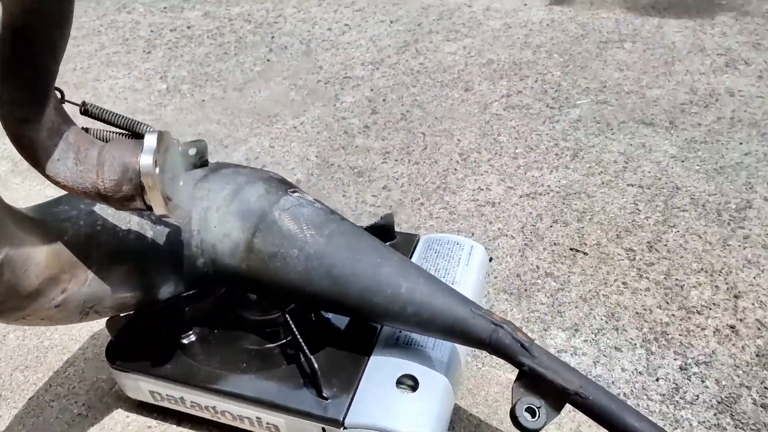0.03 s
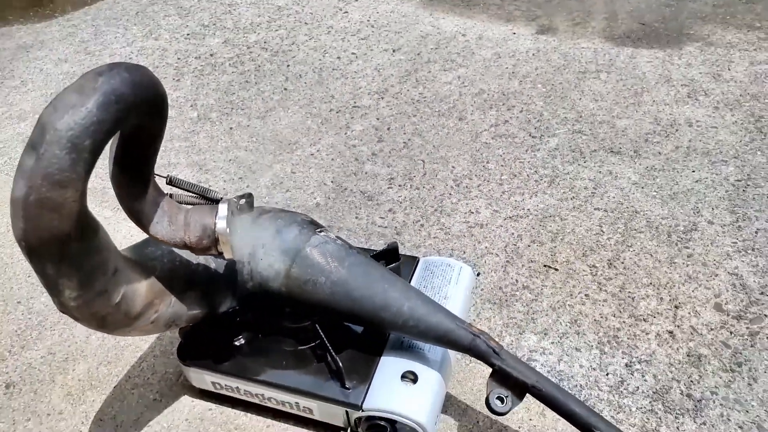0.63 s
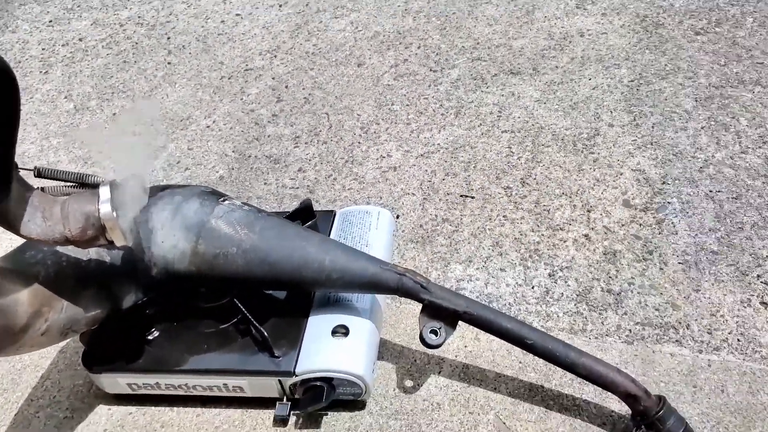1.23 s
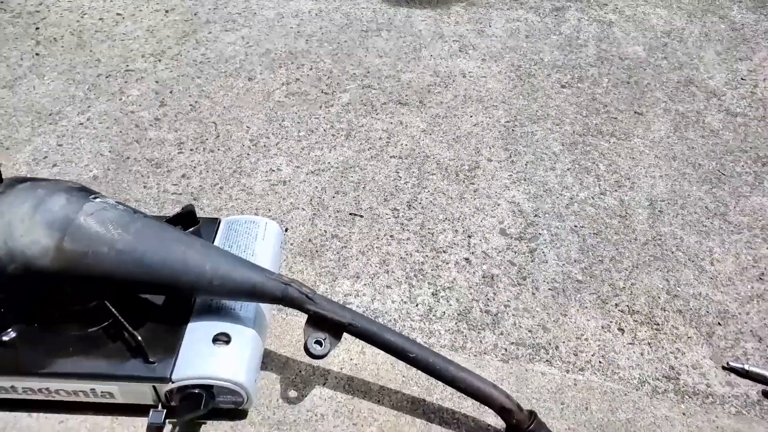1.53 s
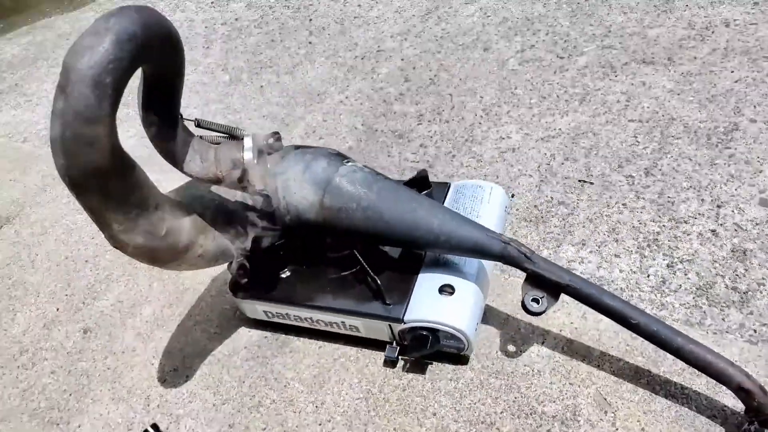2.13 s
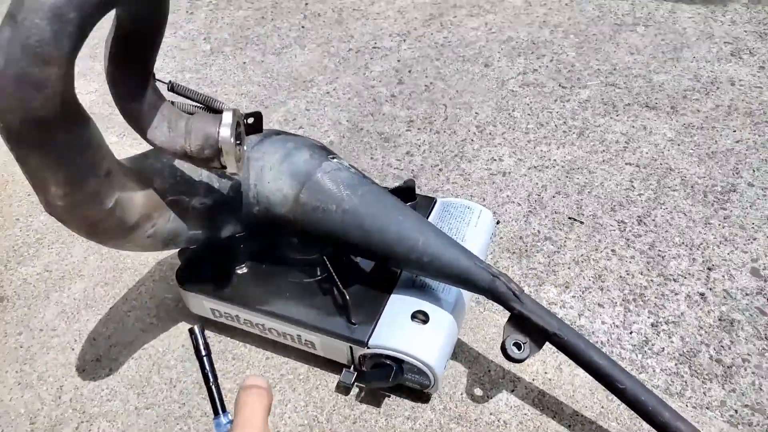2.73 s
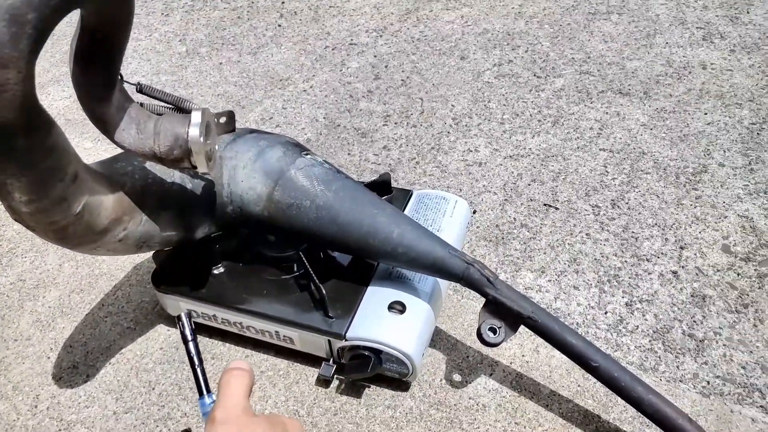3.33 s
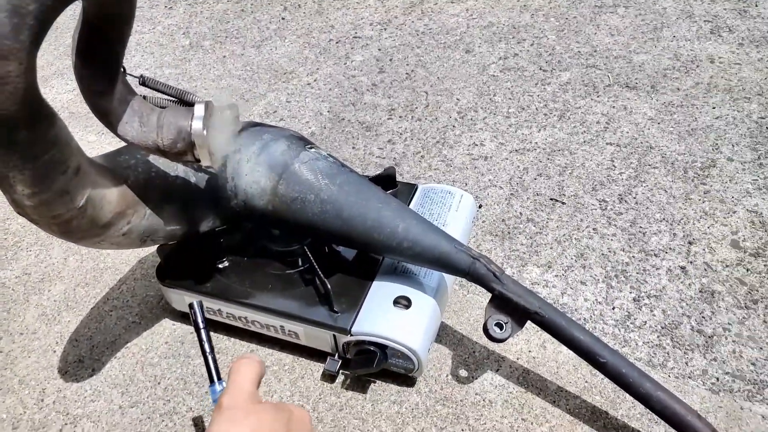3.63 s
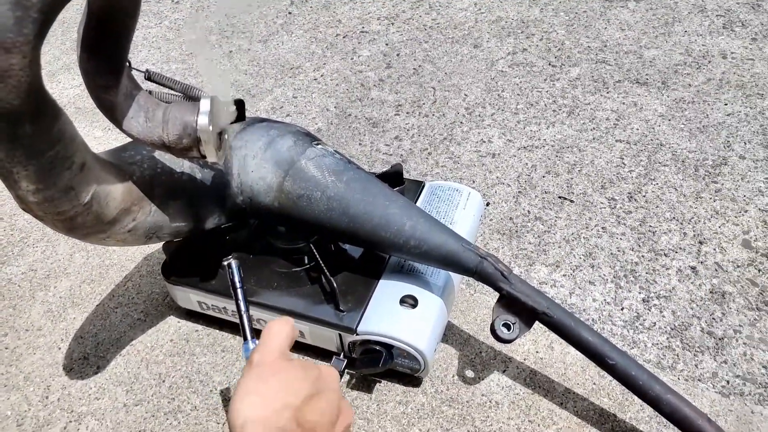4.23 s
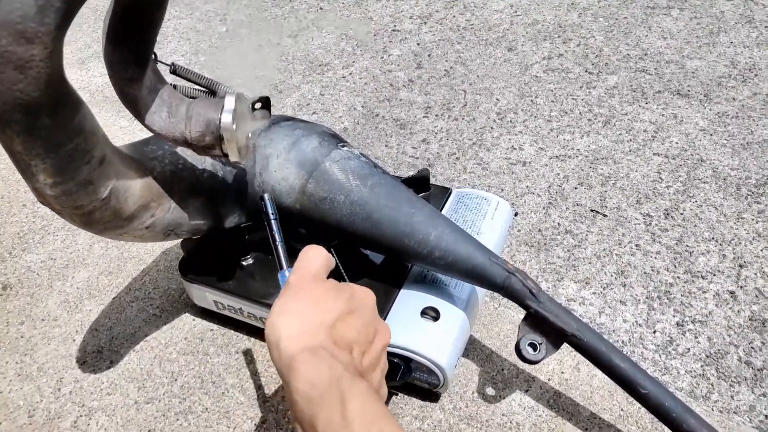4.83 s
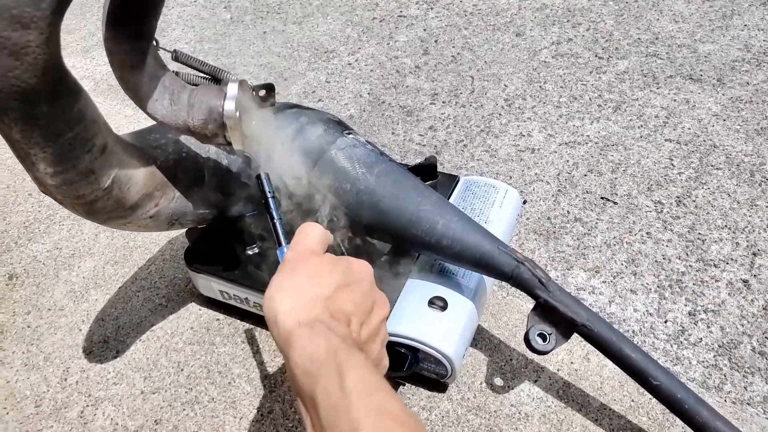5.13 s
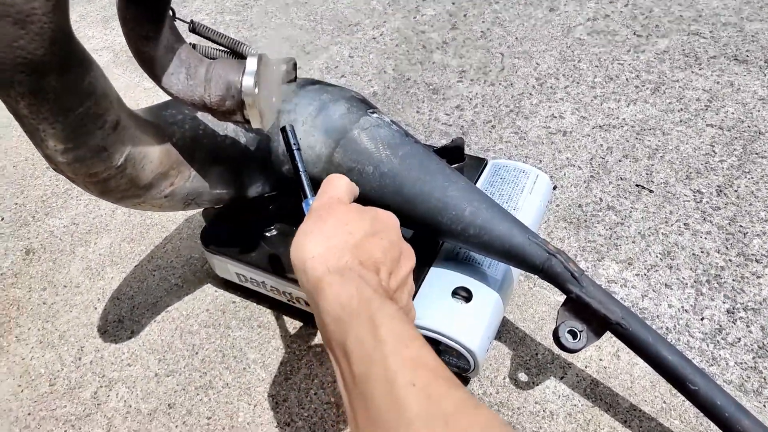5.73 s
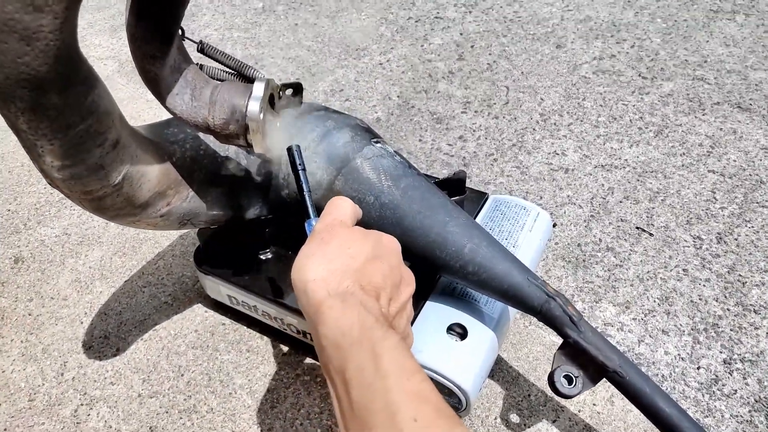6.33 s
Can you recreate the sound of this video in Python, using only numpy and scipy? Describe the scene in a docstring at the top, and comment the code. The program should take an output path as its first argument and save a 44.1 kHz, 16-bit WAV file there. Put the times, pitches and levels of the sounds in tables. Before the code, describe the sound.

Faint gas hiss and a gritty step, then one sharp lighter click and a steady rushing flame, with wind bumping the microphone.

```python
"""A camping gas stove hisses faintly under a steel exhaust pipe, outdoors on concrete, close to a stereo
microphone. Clothes rustle, a breeze buffets the two ports and a thin whistle wavers on the right.
Someone steps back, a sole rolling and cracking grit, fetches a long lighter and reaches in, which turns
the hiss pipe-like. Gas leaks from the lighter's tip, the igniter's spring hammer snaps and echoes round
the yard, and a flame hisses on steadily beside the pipe."""
import sys
import numpy as np
from scipy import signal
from scipy.fft import rfft, irfft, next_fast_len
from scipy.io import wavfile
from scipy.ndimage import map_coordinates

SR = 44100
rng = np.random.default_rng(int(sys.argv[2]) if len(sys.argv) > 2 else 0)


def log_audio(samples):
    """Write samples as a 16-bit WAV file to the path given in sys.argv[1]."""
    # one column per channel
    frames = np.atleast_2d(samples).T
    # limit to full scale, then quantise
    limited = np.clip(frames, -1, 1)
    pcm = np.round(limited * 32767).astype(np.int16)
    wavfile.write(sys.argv[1], SR, pcm)


N = 281799
TIME = np.arange(N) / SR
HZ = np.maximum(np.arange(N // 2 + 1) * SR / N, 1)

# The stove's faint jet. Each row: time in seconds, level in dB.
STOVE_LEVEL = [(0, -60.5), (1.25, -60.5), (2.7, -63), (3.25, -63), (4.0, -60.5), (4.4, -60.5),
               (4.85, -65.5), (6.39, -70)]
# A thin wavering whistle near 8.3 kHz. Each row: time in seconds, level in dB, centre in Hz.
WHISTLE_PATH = [(0, -62.5, 8500), (.35, -63, 8260), (.55, -73, 8600), (.65, -78, 8410), (.87, -62, 8300),
                (0.969, -87, 8540), (1.201, -64, 8300), (2.198, -64.5, 8250), (2.36, -72.5, 7960),
                (2.95, -61, 8370), (3.119, -72, 8420), (3.37, -59, 8390), (3.6, -71.5, 8240),
                (4.051, -62, 8300), (4.13, -74, 8270), (4.269, -58, 8340), (4.44, -74.5, 8460),
                (4.529, -61, 8270), (4.62, -89, 8220), (4.87, -63, 8200), (5.4, -63, 8500),
                (6.39, -90, 8500)]
# Body movements, each with a low rustle. Each row: start and length in seconds, level in dB.
BODY_MOVES = [(0.308, 0.77, -65), (1.36, 0.84, -67.5), (2.419, 0.17, -61.5), (2.849, 0.31, -60),
              (3.715, 0.21, -56.5), (3.3, 0.23, -54), (4.728, 0.18, -50.5), (5.073, 1.7, -57)]
# Clothes swishing, and chafing in a narrow band.
# Each row: middle and half length in seconds, level in dB, tilt in dB per octave.
CLOTH_SWISHES = [(0.35, 0.11, -51, -1), (0.67, 0.09, -51.5, 3.5), (1.043, 0.042, -57, 16),
                 (1.33, 0.017, -52, 10.5), (2.2, 0.051, -52.5, 1.5), (2.524, 0.14, -63, -2.5),
                 (2.88, 0.095, -62, 7), (3.92, 0.094, -60, 12), (4.39, 0.032, -62, 1)]
CLOTH_CHAFES = [(0.387, 0.04, -58.5, 3.5), (0.476, 0.078, -59.5, -4), (3.018, 0.02, -56.5, 8),
                (3.077, 0.062, -65.5, 0), (4.711, 0.029, -58, -0.5), (6.321, 0.042, -49, -4.5)]
# Soft thuds of feet, hands and the igniter's snap. Each row: time in seconds, level in dB.
SOFT_THUDS = [(1.364, -45.5), (1.563, -28.5), (1.923, -55), (2.013, -42.5), (2.042, -45), (4.727, -43.5),
              (5.101, -51.5)]
# Gusts on the microphone. Each row: start and length in seconds, left and right level in dB.
MIC_GUSTS = [(0.333, 0.77, -54, -62), (0.5, 0.53, -47, -55), (2.696, 0.16, -78, -49),
             (4.162, 0.4, -44, -70), (4.27, 0.13, -35.5, -60), (5.248, 0.28, -40, -75),
             (5.574, 0.46, -40, -40.5), (6.16, 0.3, -43, -48.5)]
# Eddies slapping the ports. Each row: time in seconds, peak in dB, centre in Hz, left minus right in dB.
MIC_EDDIES = [(.537, -44, 87.4, 28), (.593, -33.5, 106, 26), (.654, -32.5, 127, 22), (.742, -35, 92, -11),
              (.78, -39, 117.7, -11), (.873, -29, 121, 26), (2.728, -38.5, 115, -23),
              (2.824, -43, 118.3, -22), (4.211, -27.5, 115, 35), (4.3, -11, 247, 39), (4.307, -21, 111, 33),
              (4.332, -16, 170, 33), (4.338, -30, 119, 28), (4.373, -14.5, 128, 29),
              (4.401, -28.5, 113, 27), (5.264, -34, 94, 27), (5.306, -27, 118, 32), (5.335, -26, 114, 25),
              (5.379, -29, 109, 29), (5.424, -23.5, 152, 34), (5.454, -26, 108, 30),
              (5.514, -18.5, 137, 39), (5.593, -23, 130, 26), (5.622, -13.5, 97, 28),
              (5.64, -37, 131.3, -17), (5.72, -31, 105, -16), (5.764, -20, 116, -20),
              (5.889, -27.5, 114, -10), (5.988, -26.5, 106, -11), (6.297, -21.5, 115, 20),
              (6.311, -11, 97, 28), (6.365, -25.5, 124, -14)]
# Small sharp clicks: grit cracking underfoot, then ticks of handling the lighter.
# Each row: time in seconds, level in dB, tilt in dB per octave.
SHARP_CLICKS = [(1.084, -47.5, -1), (1.4167, -12, 3.5), (1.441, -20, -3.5), (1.467, -23.5, -1),
                (1.533, -36, 3), (1.542, -23, -3.5), (1.5832, -18.5, 3.5), (1.605, -22, 2), (1.714, -28, 5),
                (1.788, -37, 4), (1.794, -27, 0), (1.804, -23, 1), (1.837, -28, 9), (1.921, -17, 0.5),
                (1.931, -17, -8), (1.935, -28.5, -2), (1.9402, -9, 6), (1.943, -17, 8), (1.9496, -9, 4),
                (1.959, -19, -1), (1.9743, -11, 13), (1.978, -5.5, 6.5), (1.991, -26, 3), (2.065, -32, 2),
                (2.51, -45, -8), (4.73, -36.5, -5.5), (4.811, -31, -10), (4.846, -39.5, 1)]
# Strokes of a sole over the concrete.
# Each row: start and end in seconds, level in dB, first and last tilt in dB per octave.
SOLE_STROKES = [(1.344, 1.394, -55, -1, 0), (1.411, 1.441, -31.5, 1, 0.5), (1.534, 1.554, -34.5, 3, -0.5),
                (1.58, 1.922, -44, 7, 2), (1.917, 1.96, -28.5, -1, 8), (1.9755, 1.978, -18.5, 5.5, 5.5),
                (1.984, 1.986, -32, 4.5, 4)]
# The foot ends its step further to the right. Each row: time in seconds, left and right gain in dB.
FOOT_POSITION = [(1.4, 0, -1), (1.85, 1.5, 0.5), (1.95, -1, -1)]
# Soft low puffs and bumps. Each row: start and length in seconds, level in dB.
PUFFS_AND_BUMPS = [(3.375, 0.021, -47.5), (4.73, 0.011, -42.5)]

# The tone of each source. Each row: frequency in Hz, relative spectral level in dB.
JET_TONE = [(25, 31), (100, 21.5), (500, 6.5), (1400, -0.5), (2800, 0.5), (4300, 0), (6000, 0.5),
            (7600, 6.5), (9000, 4), (11000, -0.5), (13000, -3), (15500, 0)]
RUSTLE_TONE = [(25, 3), (90, 5), (200, 8), (350, 1), (650, -15.5), (950, -15), (1500, -25.5), (4000, -37),
               (12000, -66)]
SWISH_TONE = [(200, -19), (1300, -18), (2600, -15), (3900, -0.5), (5200, 2), (8000, 9), (11000, 6),
              (15000, -1.5)]
CHAFE_TONE = [(500, -20.5), (2300, -9), (3050, -3.5), (3400, -3), (3950, 4.5), (4400, -2), (5200, -19),
              (8000, -14), (15000, -47)]
THUD_TONE = [(30, -23), (100, -3.5), (200, -9), (370, 2.5), (520, -0.5), (700, -8), (1500, -20),
             (2500, -18), (8000, -99)]
WIND_TONE = [(20, -26), (45, -2.5), (75, 2), (115, 2.5), (170, -8.5), (260, -17), (450, -30.5), (1000, -44),
             (4000, -100)]
SOLE_TONE = [(20, -92), (100, -57), (240, -8), (400, -0.5), (560, -6), (850, -2), (1500, 3), (2400, 2.5),
             (4000, 0.5), (5500, -2), (8000, 4), (11000, -4.5), (13000, -9.5), (15500, -11)]   # shared by the sharp clicks
PUFF_BUMP_TONE = [(60, -14), (150, 5.5), (260, 9.5), (420, -2.5), (620, -10), (900, -16), (1500, -19),
                  (2300, -42), (6000, -64)]
GAP_TONE = [(300, -2), (1050, -9), (1650, 3.5), (2400, -12), (4000, -6.5), (6000, -1.5), (8000, -0.5),
            (10300, -11), (15000, -25)]   # the stove heard through the gap between hand and pipe
GAS_TONE = [(300, -40), (1400, -17), (4000, -29), (6000, -5), (8300, -1), (10000, 4), (11200, 8),
            (13000, -3), (15000, -13)]
FLAME_TONE = [(80, 7), (450, 3.5), (800, 6.5), (1600, 4), (2400, -3.5), (4000, -1.5), (5700, 3.5),
              (7200, 2), (8300, -1), (9600, -9.5), (11000, -2.5), (12600, -2), (15300, -2.5)]
IGNITER_TONE = [(100, -3), (500, -19.5), (1100, -9.5), (1700, -6.5), (2700, -1), (3700, -10), (4800, -8.5),
                (7000, 0), (8300, -1.5), (9400, 1), (11000, -4), (13000, -3), (15500, -5.5)]
YARD_TONE = [(200, -6), (1500, -12.5), (2600, 5.5), (3600, -2), (4800, 10), (6000, 4.5), (8300, 9.5),
             (11000, 6), (13000, 4), (15500, 8.5)]   # the snap coming back off ground and walls

# Resonances and cancellations. Each row: centre and width in Hz, gain in dB.
HISS_RESONANCES = [(874, 87, 9), (1820, 200, 3), (2670, 166, 9), (3460, 180, 3), (4220, 94, -8),
                   (5020, 130, 9), (5100, 80, -2), (5800, 350, -1.5), (7340, 85, 10.5), (7550, 89, 6.5),
                   (8150, 70, -8)]   # steady and narrow, they make the faint hiss sound hollow
HAND_GAP_BANDS = [(2600, 140, 11), (2760, 77, -5), (2930, 80, 12.5), (3240, 140, -19), (3730, 100, 13.5),
                  (4450, 200, -19), (4830, 110, 5), (5170, 220, -30), (6150, 100, -9)]
GAS_GAP_NOTCHES = [(4450, 200, -26), (5120, 130, -28), (6200, 110, -10), (9600, 180, -9)]   # the unlit gas reflecting in that gap
FLAME_COMB_LEFT = [(1230, 270, -14), (1650, 120, -27), (2060, 43, -8), (2450, 68, 2), (2900, 83, 3),
                   (3340, 135, -22), (3835, 126, -16), (4360, 160, -17), (5100, 220, -25), (6200, 300, -22),
                   (6900, 110, -20), (7940, 83, 1), (8350, 170, 9), (9100, 150, 4), (9400, 100, 0),
                   (11750, 400, -8)]   # reflections off pipe and stove, at each port
FLAME_COMB_RIGHT = [(1193, 97, -38), (2090, 29, -16), (2800, 110, -30), (3210, 124, -37), (3610, 100, -39),
                    (4540, 154, -25), (5030, 99, -28), (5330, 75, -16), (6320, 170, -8), (9100, 200, 2),
                    (9500, 200, -15), (10900, 490, -26)]
BARREL_RING = [(1550, 250, 2), (2160, 260, -14.5), (2780, 330, 0), (3360, 130, -6), (4850, 120, 8.5),
               (5540, 200, -5), (7040, 1300, 8.5), (8200, 260, 2.5), (8220, 120, 8), (10650, 610, 7)]   # the igniter and its barrel

# Response of the two microphone ports. Each row: frequency in Hz, gain in dB.
MIC_LEFT = [(500, -4), (1500, -3.5), (4000, -3), (6000, -6), (7800, -9.5), (8450, -10.5), (9300, -1),
            (10900, 8.5), (13000, 2.5), (15500, -3.5)]
MIC_RIGHT = [(500, -4.5), (1500, 0), (4000, 5), (6000, 1.5), (7800, 3.5), (8300, 6.5), (8800, 4.5),
             (9600, -7), (10200, -8.5), (11500, -7), (13000, -9), (15500, -2.5)]

STRIKE_S = 5.1038   # the igniter strikes and the flame takes over from the unlit gas


def from_db(db):
    """Decibels to gain."""
    return 10 ** (np.asarray(db) / 20)


def gains(rows):
    """Each dB column of a curve as a gain at every sample."""
    s, *columns = np.transpose(rows)
    return [from_db(np.interp(TIME, s, c)) for c in columns]


def response(points, tilt_db=0, at=HZ):
    """Gain at every frequency, tilted by so many dB an octave."""
    hz, db = np.transpose(points)
    return from_db(np.interp(np.log(at), np.log(hz), db) + tilt_db * np.log2(at / 1000))


def ripple(bands):
    """Gain at every frequency from a few bell-shaped peaks and dips."""
    level = np.zeros(len(HZ))
    for hz, width, db in bands:
        near = slice(*np.searchsorted(HZ, [hz - 3 * width, hz + 3 * width]))
        level[near] += db * np.exp(-((HZ[near] - hz) / width) ** 2)
    return from_db(level)


def colour(x, gain):
    """Give white sound a spectrum and keep its power."""
    return irfft(rfft(x) * gain / np.sqrt(np.mean(gain ** 2)), N)


def stereo_noise(alike, lag_ms=0):
    """White noise at two ports; the shared part reaches the left one lag_ms later."""
    shared = rng.standard_normal(N)
    direct = np.array([np.roll(shared, round(lag_ms * SR / 1000)), shared])
    return np.sqrt(alike) * direct + np.sqrt(1 - alike) * rng.standard_normal((2, N))


def flutter(per_s, depth_db):
    """A gain that wanders at random."""
    knots = rng.standard_normal(8192)
    return from_db(depth_db * np.interp(TIME * per_s, np.arange(len(knots)), knots))


def shimmer(x, per_s, depth_db, width_hz):
    """The colour shifts: each band at each port wanders in level by itself."""
    hz, s, spectra = signal.stft(x, SR, nperseg=512)
    grid = np.meshgrid(hz / width_hz, s * per_s, indexing="ij")
    knots = rng.standard_normal((2, 128, 128))
    patches = np.array([map_coordinates(port, grid, order=1, mode="mirror") for port in knots])
    return signal.istft(spectra * from_db(depth_db * patches), SR)[1][:, :N]


def swell(s, half, db):
    """A bell-shaped rise and fall."""
    return from_db(db) * np.exp(-.5 * np.minimum(((TIME - s) / half) ** 2, 100))


def burst(s, length, db, attack_s, release_s):
    """A level held from s on, with an exponential rise before and fall after."""
    near = slice(*np.searchsorted(TIME, [s - 10 * attack_s, s + length + 10 * release_s]))
    before = np.maximum(s - TIME[near], 0)
    after = np.maximum(TIME[near] - s - length, 0)
    out = np.zeros(N)
    out[near] = from_db(db) * np.exp(-before / attack_s - after / release_s)
    return out


def together(envelopes):
    """Envelopes adding in power."""
    return np.sqrt(sum(e ** 2 for e in envelopes))


def scatter(x, db, reach_ms, count=14):
    """Weak reflections off nearby things, different at each port."""
    lags = (rng.uniform(.05, 1, (2, count)) * reach_ms * SR / 1000).astype(int)
    signs = rng.choice([-1, 1], (2, count))
    echoes = [sum(sign * np.roll(port, lag) for lag, sign in zip(port_lags, port_signs))
              for port, port_lags, port_signs in zip(x, lags, signs)]
    return x + from_db(db) * np.array(echoes) / np.sqrt(count)


def rub(texture, strokes, spectrum):
    """Strokes of one texture, each with its own envelope and brightness."""
    out = np.zeros((2, N))
    for envelope, tilt_db in strokes:
        near = np.flatnonzero(envelope > 1e-3 * envelope.max())
        size = next_fast_len(len(near) + 1024)
        hz = np.maximum(np.arange(size // 2 + 1) * SR / size, 1)
        gain = response(spectrum, tilt_db, hz)
        part = rfft(texture[:, near] * envelope[near], size) * gain / np.sqrt(np.mean(gain ** 2))
        out[:, near] += irfft(part, size)[:, :len(near)]
    return out


def stove(left_hollowness=0.99):
    """The gas jet under the pipe: a faint hiss that sounds hollow at the microphone."""
    resonances = ripple(HISS_RESONANCES) ** np.array([[left_hollowness], [1]])
    hiss = colour(stereo_noise(alike=0.17), response(JET_TONE) * resonances)
    hiss = scatter(hiss, db=-1.5, reach_ms=8)
    return shimmer(hiss, per_s=6, depth_db=5.5, width_hz=200) * gains(STOVE_LEVEL)[0]


def whistle(width_hz=85):
    """A thin wavering whistle near 8.3 kHz, mostly at the right port."""
    s, db, hz = np.transpose(WHISTLE_PATH)
    unsteady = colour(rng.standard_normal((2, N)), 1 / (1 + (HZ / width_hz) ** 2))
    phase = 2 * np.pi * np.cumsum(np.interp(TIME, s, hz)) / SR
    level = from_db(np.interp(TIME, s, db)) * flutter(per_s=25, depth_db=4.0)
    tone = unsteady[0] * np.cos(phase) + unsteady[1] * np.sin(phase)
    return level * tone * from_db([[-2], [0]])


def body(still_db=-75.5, drag_db=-55, attack_s=0.094, release_s=0.1):
    """Close by: a low rustle, a dragged foot's rumble and thuds of feet, hands and the igniter's snap."""
    knocks = [burst(s, 0.00045, db, attack_s=0.0018, release_s=0.0099) for s, db in SOFT_THUDS]
    start, end, *_ = max(SOLE_STROKES, key=lambda row: row[1] - row[0])   # the longest is the drag
    drag = burst(start, end - start, drag_db, attack_s, release_s)
    thuds = colour(stereo_noise(alike=0.95), response(THUD_TONE)) * together(knocks + [drag])
    moves = [burst(*move, attack_s, release_s) for move in BODY_MOVES]
    moving = together(moves + [from_db(still_db)])
    rustle = colour(stereo_noise(alike=0.92), response(RUSTLE_TONE, tilt_db=-0.5))
    return thuds + rustle * moving * flutter(per_s=16, depth_db=2.86)


def clothes():
    """Cloth rubs close to the microphone, in bright swishes and narrow-band chafes."""
    swishes = [(swell(s, half, db), tilt_db) for s, half, db, tilt_db in CLOTH_SWISHES]
    chafes = [(swell(s, half, db), tilt_db) for s, half, db, tilt_db in CLOTH_CHAFES]
    swishing = rub(stereo_noise(alike=0.091), swishes, SWISH_TONE)
    return swishing + rub(stereo_noise(alike=0.099), chafes, CHAFE_TONE)


def wind(wake_db=-9.5, wake_s=0.0096, sharp_db=-16):
    """Each port has its own turbulence; an eddy is a pressure lump between two dips, or for every other eddy a
    dip between two lumps, wrapped in churn."""
    left = together(burst(s, length, db, attack_s=.02, release_s=.035) for s, length, db, _ in MIC_GUSTS)
    right = together(burst(s, length, db, attack_s=.02, release_s=.035) for s, length, _, db in MIC_GUSTS)
    churn = colour(rng.standard_normal((2, N)), response(WIND_TONE))
    air = churn * [left, right] * flutter(per_s=52, depth_db=4.5)
    for k, (s, db, hz, pan_db) in enumerate(MIC_EDDIES):
        near = np.abs(TIME - s) < .06
        age = TIME[near] - s
        roundness = 2 + max(sharp_db - db, 0)   # weaker eddies are rounder
        spread = (np.pi * hz * age) ** 2 / roundness
        polarity = (-1) ** (k + 1)
        lump = polarity * (1 - (2 * roundness + 1) * spread) / (1 + spread) ** (roundness + 2)
        wake = churn[:, near] * from_db(wake_db) * np.exp(-np.abs(age) / wake_s)
        port_db = db + np.minimum([[pan_db], [-pan_db]], 0)
        air[:, near] += from_db(port_db) * (lump + wake)
    return air


def scuffs(attack_s=0.0071, release_s=0.025, tail_db=-8, tail_s=0.054):
    """Envelopes and tilts of a sole rolling from heel to toe; the yard answers with a short tail."""
    strokes, tails = [], []
    for s, end, db, heel_tilt_db, toe_tilt_db in SOLE_STROKES:
        length = end - s
        push = burst(s, length, db, min(attack_s, length), min(release_s, length))
        rolled = np.clip((TIME - s) / length, 0, 1)
        strokes += [(push * (1 - rolled), heel_tilt_db), (push * rolled, toe_tilt_db)]
        built_up = np.sqrt(1 - np.exp(-2 * length / tail_s))
        tails.append(built_up * burst(end, 0, db + tail_db, attack_s, tail_s))
    return strokes + [(together(tails), 0)]


def scrapes_and_clicks(grains_per_s=5000, spread_db=1.3, smooth_db=-3):
    """The sole rolls countless grains and cracks a few big ones; later the lighter ticks in the hand."""
    sizes = from_db(spread_db * np.minimum(rng.exponential(1, N), 3.5))
    grains = sizes * (rng.random(N) < grains_per_s / SR)
    pressure = np.sqrt(grains ** 2 / np.mean(grains ** 2) + from_db(smooth_db) ** 2)
    texture = stereo_noise(alike=0.044, lag_ms=.3) * pressure / np.sqrt(np.mean(pressure ** 2))
    scrape = rub(texture * flutter(per_s=130, depth_db=1.2), scuffs(), SOLE_TONE)
    snaps = [(burst(s, 0, db, attack_s=.0001, release_s=.0005), tilt) for s, db, tilt in SHARP_CLICKS]
    clicks = rub(stereo_noise(alike=0.57, lag_ms=.3), snaps, SOLE_TONE)
    return scatter(scrape + clicks, db=-6.5, reach_ms=9) * gains(FOOT_POSITION)


def puffs_and_bumps():
    """A soft low puff, and later a bump of the hand, swell near the centre and are gone."""
    envelope = together(burst(*row, attack_s=.03, release_s=.06) for row in PUFFS_AND_BUMPS)
    return colour(stereo_noise(alike=0.86), response(PUFF_BUMP_TONE)) * envelope


def reach(start_s=4.78):
    """The hiss turns pipe-like, mostly on the right, as the hand closes in on the burner."""
    closeness = burst(start_s, STRIKE_S - start_s, db=-58, attack_s=0.18, release_s=0.12)
    hiss = colour(stereo_noise(alike=0.17), response(GAP_TONE) * ripple(HAND_GAP_BANDS))
    return hiss * closeness * from_db([[-5], [0]])


def unlit_gas(open_s=4.93):
    """Gas streams from the lighter's tip in a bright hiss that fades after the strike."""
    flow = burst(open_s, STRIKE_S - open_s, db=-50, attack_s=.03, release_s=.09)
    leak = colour(stereo_noise(alike=0.21, lag_ms=.13), response(GAS_TONE) * ripple(GAS_GAP_NOTCHES))
    return leak * flow * from_db([[0], [-.5]])


def igniter(trip_lead_s=0.002, echo_delay_s=0.033, tail_db=-35, tail_t60_s=0.65):
    """The spring hammer trips and strikes home; ground and walls send back an echo that dies away."""
    trip = burst(STRIKE_S - trip_lead_s, 0, db=-21.5, attack_s=0.0005, release_s=0.0019)
    strike = burst(STRIKE_S, 0.002, db=-10, attack_s=0.0005, release_s=0.0019)
    ring = ripple(BARREL_RING)
    hammer = stereo_noise(alike=0.6, lag_ms=.2) * together([trip, strike])
    snap = colour(hammer, response(IGNITER_TONE) * ring)
    age = TIME - STRIKE_S
    echo = swell(STRIKE_S + echo_delay_s, half=0.011, db=-34)
    tail = (age > 0) * from_db(tail_db - 60 * np.abs(age) / tail_t60_s)
    yard = colour(stereo_noise(alike=0.098) * (echo + tail), response(YARD_TONE) * np.sqrt(ring))
    return snap + yard


def flame(start_db=-61.5, steady_db=-47.5, settle_s=0.094):
    """The lighter's flame grows to a broad steady rush, combed by the metal around it."""
    unsettled = np.exp(-np.maximum(TIME - STRIKE_S, 0) / settle_s)
    level = (TIME > STRIKE_S) * from_db(steady_db + (start_db - steady_db) * unsettled)
    comb = np.array([ripple(FLAME_COMB_LEFT), ripple(FLAME_COMB_RIGHT)])
    rush = colour(stereo_noise(alike=0.43, lag_ms=.13), response(FLAME_TONE) * comb)
    rush = shimmer(rush, per_s=7, depth_db=2.0, width_hz=454) * level
    return rush * flutter(per_s=24, depth_db=1.0) * from_db([[-1], [.5]])


def scene():
    """Everything that reaches the microphone."""
    background = stove() + whistle() + reach()
    movement = scrapes_and_clicks() + body() + clothes() + puffs_and_bumps()
    lighter = unlit_gas() + flame() + igniter()
    return background + movement + lighter + wind()


def record(dry, low_cut_hz=52, high_cut_hz=15600, ceiling=.8):
    """Each port rings at its own treble resonance; peaks are rounded; deep bass and the top are cut."""
    ports = np.array([response(MIC_LEFT), response(MIC_RIGHT)])
    high_pass = HZ ** 2 / np.hypot(HZ ** 2, low_cut_hz ** 2)
    picked_up = irfft(rfft(dry) * ports * high_pass, N)
    rounded = ceiling * np.tanh(picked_up / ceiling)
    low_pass = 1 / np.sqrt(1 + (HZ / high_cut_hz) ** 240)
    return irfft(rfft(rounded) * low_pass, N)


dry = scene()
out = record(dry)
log_audio(out)
```